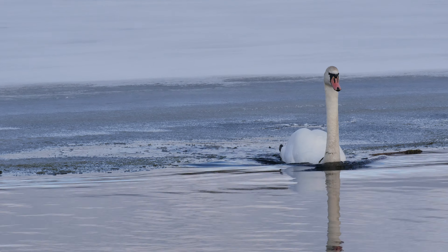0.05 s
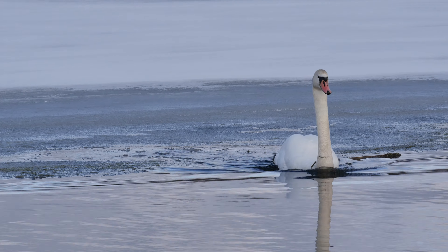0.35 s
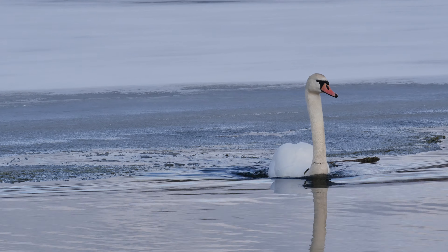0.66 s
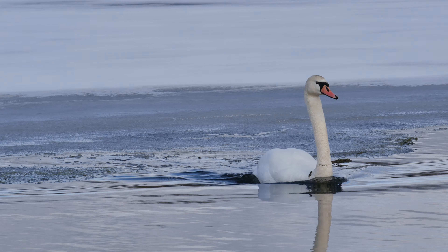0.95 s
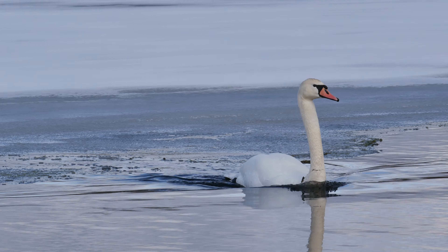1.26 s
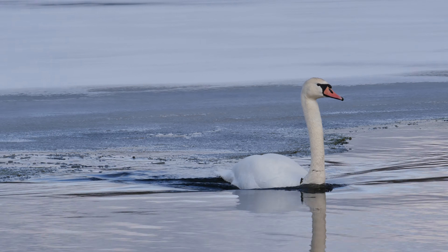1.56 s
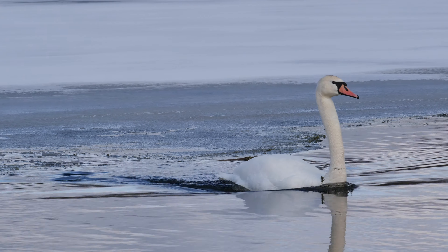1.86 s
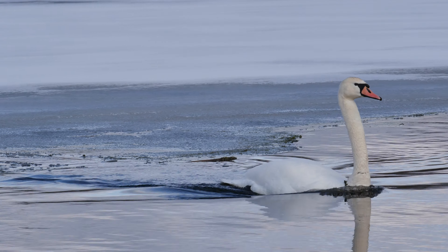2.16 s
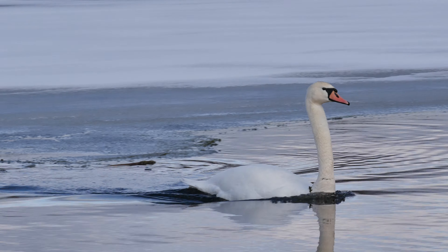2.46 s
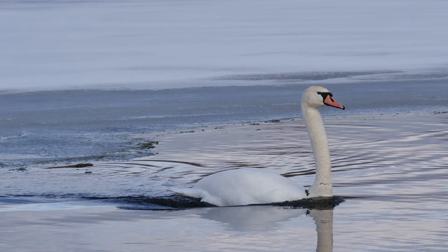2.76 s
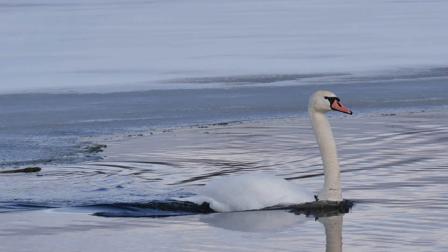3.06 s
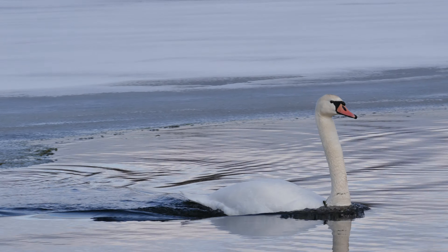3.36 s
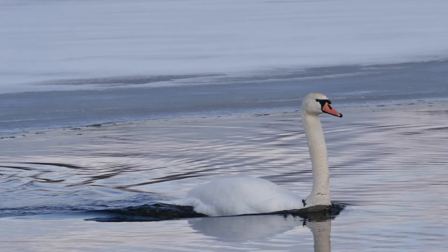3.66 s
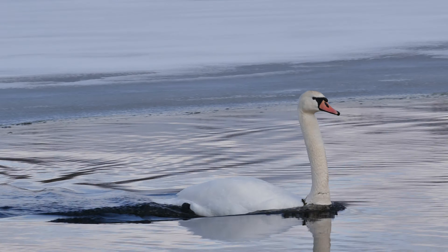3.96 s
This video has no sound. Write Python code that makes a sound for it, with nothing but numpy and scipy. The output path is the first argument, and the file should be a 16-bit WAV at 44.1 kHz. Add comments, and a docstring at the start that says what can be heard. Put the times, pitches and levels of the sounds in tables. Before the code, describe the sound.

Gusts of wind buffet the microphone, with faint drips and ticks from thawing ice behind.

```python
"""Wind on a half-frozen lakeside

Gusts rumble on the microphone and single eddies thump it, the hardest with a dry crack.
The thumps saturate the microphone and make the recorder duck its gain, which creeps back.
Behind them lies a soft far rush, with faint bubbling drips and tiny ticks from the thawing ice."""
import sys
import numpy as np
from scipy import signal
from scipy.io import wavfile
from scipy.ndimage import uniform_filter1d

SR = 44100
rng = np.random.default_rng(int(sys.argv[2]) if len(sys.argv) > 2 else 0)


def unload_audio(sound):
    """Save the sound as a 16-bit wav file, at the path given as the first command line argument."""
    columns = np.transpose(np.atleast_2d(sound))
    # keep every value between -1 and 1, then stretch to whole-number steps
    steps = np.round(np.clip(columns, -1, 1) * 32767)
    wavfile.write(sys.argv[1], SR, steps.astype(np.int16))


N = 176400
T = np.arange(N) / SR

# wind strength at the microphone (time [s], level [dB])
GUST_LEVEL = [(0, -25), (.05, -28.5), (.1, -16.5), (.17, -27.5), (.3, -30.5), (.37, -42), (.52, -30),
              (.58, -37), (.65, -23.5), (.8, -19.5), (.87, -29.5), (.96, -18.5), (1.02, -23), (1.19, -36),
              (1.33, -33.5), (1.42, -48.5), (1.5, -32), (1.62, -41.5), (2.25, -44), (2.3, -24), (2.38, -29),
              (2.45, -16), (2.61, -32.5), (2.68, -31), (2.74, -22), (2.87, -23.5), (2.99, -37.5),
              (3.17, -36), (3.35, -34), (3.5, -31.5), (3.6, -35.5), (3.66, -41), (3.9, -42), (4, -38)]
# rumble bands (low [Hz], high [Hz], level in a strong gust [dB], growth [dB per dB of gust], L-R [dB])
RUMBLE_BANDS = [(71, 140, -29.5, 0.71, 1.1), (104.8, 181.7, -24.5, 1.0, 0.7), (227, 342.3, -30, 1.44, -6),
                (331, 507, -39, 1.9, -13)]
# eddies striking the microphone (time [s], strength [dB], pitch [Hz])
EDDIES = [(0.08, -1, 184), (0.179, -12.5, 190), (.229, -11.5, 158), (.28, -16, 202), (.3, -14, 178),
          (0.51, -18.5, 167), (.561, -17.5, 163), (0.638, -5.5, 169), (.648, -5, 166), (0.678, -6, 161),
          (.787, -9, 187), (.848, -4.5, 167), (0.893, -8, 191), (0.933, -18, 182), (.982, -7, 182),
          (1.005, -2.5, 242), (1.045, -7.5, 177), (1.111, -6.5, 193), (1.123, -10, 166), (1.502, -19, 141),
          (1.655, -20, 128), (1.828, -28.5, 167), (2.298, -9.5, 120), (2.313, -11.5, 197),
          (2.422, -8.5, 241), (2.447, -24, 186), (2.479, -9.5, 175), (2.564, -14, 150), (2.728, -12.5, 176),
          (2.749, -9.5, 200), (2.822, -14.5, 145), (2.896, -12, 156), (3.043, -14, 171), (3.09, -18, 160),
          (3.285, -20, 118), (3.475, -18, 135), (3.526, -20.5, 157), (3.559, -17.5, 156),
          (3.595, -21.5, 143), (3.697, -19, 136)]
# cracks of the hardest eddies at the microphone port (time [s], peak [dB])
PORT_CRACKS = [(0.08, -43), (.846, -40.5), (1.005, -36)]
# meltwater drips (time [s], level [dB], starting pitch [Hz])
MELT_DRIPS = [(.527, -50.5, 2490), (0.529, -53.5, 3170), (1.971, -53, 2950), (2.02, -51.5, 2220),
              (2.103, -52, 3010), (2.276, -48, 2980), (2.518, -53.5, 3120), (2.685, -52.5, 1950),
              (2.94, -56.5, 3030), (3.414, -53, 2290), (3.535, -42.5, 2000), (3.778, -43, 2160),
              (3.881, -56.5, 3330), (3.99, -43, 2080)]
# clear ticks of the ice (time [s], peak [dB], band centre [Hz])
ICE_TICKS = [(.97, -57, 10650), (2.03, -48, 6700), (2.18, -52, 9200), (2.2, -39.5, 9300),
             (2.205, -44, 9400), (3.433, -53, 7370), (3.493, -50, 7040), (3.725, -44.5, 8700),
             (3.882, -48, 9840)]
# swell of the far rush (time [s], level [dB])
RUSH_SWELL = [(0, -46.5), (.3, -45), (.58, -45.5), (.9, -46), (1.3, -46), (2.1, -44.5), (2.9, -46.5),
              (3.5, -44.5), (4, -43)]
# its tone colour (frequency [Hz], relative spectral density [dB])
RUSH_COLOUR = [(100, -14), (300, -6.5), (480, 1.5), (640, -0.5), (800, 2), (1150, -0.5), (1600, -9),
               (2500, -20.5), (3700, -22.5), (5000, -29), (7000, -34.5), (8300, -40.5), (10000, -30),
               (12000, -35), (15000, -37.5)]
# its treble lift (time [s], gain [dB])
RUSH_TREBLE = [(0, 1.5), (.35, 0), (.55, -0.5), (1, -.5), (1.5, -2.5), (2.05, 1), (2.6, 1.5), (3, -3),
               (3.55, 1), (4, 0)]
# how alike its left and right are (frequency [Hz], coherence [0-1])
RUSH_COHERENCE = [(300, .8), (550, 0.63), (850, 1), (2400, 0.61), (5000, .9), (10000, 0.86)]
# its stereo balance (frequency [Hz], L-R [dB])
RUSH_PAN = [(200, 4.5), (500, 4), (900, -2), (1800, -4), (3500, -4), (6000, -1), (10000, 0.5)]
# how far its left side leads (frequency [Hz], phase [rad])
RUSH_LEAD = [(300, 0.98), (700, -.95), (1800, -1.08), (2800, -.55), (4500, -0.47), (9000, 0.42)]

WIND_LAG_S = 0.00041  # the air reaches the right port later


def wind_rumble():
    """Turbulence follows the gust, higher bands more steeply, so strong gusts sound brighter."""
    strong_gust_db = -21
    gust_db = over_time(GUST_LEVEL) - strong_gust_db
    return sum(place(from_db(db + growth * gust_db) * turbulence(low, high), pan_db, WIND_LAG_S)
               for low, high, db, growth, pan_db in RUMBLE_BANDS)


def turbulence(low_hz, high_hz, evenness=0.68, lump_db=5, window=2200):
    """Low pressure noise, its slow swings evened out, arriving in quick lumps."""
    churn = noise(low_hz, high_hz)
    power = uniform_filter1d(uniform_filter1d(churn ** 2, window), window // 2) + 1e-6
    lumps = from_db(lump_db * drift(rate_hz=46.4))
    return unit_power(churn / power ** (evenness / 2) * lumps)


def eddy_thumps(width_cycles=0.47, wake_s=0.0076):
    """Each eddy is one swing of suction and pressure inside a short churning wake."""
    swings, wakes = np.zeros((2, N))
    for s, db, hz in EDDIES:
        cycles = (T - s) * hz
        envelope = np.exp(-.5 * (cycles / width_cycles) ** 2)
        swings += from_db(db - 2.5) * np.sin(2 * np.pi * cycles) * envelope
        wakes += from_db(db - 14.5) * np.exp(-.5 * ((T - s) / wake_s) ** 2)
    return place(swings + wakes * turbulence(95, 290), pan_db=-1.5, lag_s=WIND_LAG_S)


def port_cracks(decay_s=0.00079):
    """The hardest eddies crack at the port, putting a dry edge on their thumps."""
    cracks = sum(from_db(db) * snap(s, decay_s, 500, 2200, order=1) for s, db in PORT_CRACKS)
    return place(cracks, pan_db=-1.5)


def drips(attack_s=0.0016, decay_s=0.0029, rise_per_s=4.4):
    """Each drip splashes and traps a bubble that rings briefly and rises in pitch."""
    out = np.zeros(N)
    for s, db, hz in MELT_DRIPS:
        t = np.clip(T - s, 0, .1)
        splash = from_db(-7.5) * noise(hz * .92, hz * 1.2)
        bubble = np.sin(2 * np.pi * hz * t * (1 + rise_per_s * t / 2))
        envelope = (1 - np.exp(-t / attack_s)) * np.exp(-t / decay_s)
        out += from_db(db) * envelope / (envelope.max() + 1e-9) * (bubble + splash)
    return place(out, pan_db=-5.5)


def thawing_ice(tick_decay_s=.0009, band_ratio=1.24, clicks_per_band_per_s=39):
    """A few bright ticks over a fine crackle of the thaw that swells with the rush."""
    out = sum(from_db(db) * snap(s, tick_decay_s, hz / band_ratio, hz * band_ratio)
              for s, db, hz in ICE_TICKS)
    rush_db = over_time(RUSH_SWELL)
    crackle_gain = from_db(-57.5 + 2.5 * (rush_db - rush_db.max()))
    for hz in (2600, 3400, 4100, 6650, 9800):
        onsets = rng.random(N) < clicks_per_band_per_s / SR
        clicks = onsets * from_db(2.5 * np.minimum(rng.exponential(1, N), 2))
        r, w = np.exp(-hz / (2.5 * SR)), 2 * np.pi * hz / SR  # a ring that decays in 2.5 cycles
        ring = signal.lfilter([0, np.sin(w)], [1, -2 * r * np.cos(w), r * r], clicks + 1e-18)
        out += crackle_gain * ring
    return place(out, pan_db=1.5)


def far_rush(waver_db=1.02, full_treble_hz=4000):
    """A soft, distant bed of third-octave noise: lows lean left, upper mids lean right."""
    out, edges = 0, np.geomspace(110, 15500, 23)
    treble_db = over_time(RUSH_TREBLE)
    for low, high in zip(edges, edges[1:]):
        hz = np.sqrt(low * high)
        coherence = at_hz(RUSH_COHERENCE, hz)
        mid = np.sqrt(1 + coherence) * noise(low, high)
        side = np.sqrt(1 - coherence) * noise(low, high) * [[1], [-1]]
        db = at_hz(RUSH_COLOUR, hz) + waver_db * drift(rate_hz=8)
        db += treble_db * min(hz / full_treble_hz, 1)
        lag_s = at_hz(RUSH_LEAD, hz) / (2 * np.pi * hz)
        out += np.sqrt(high - low) * from_db(db) * place(mid + side, at_hz(RUSH_PAN, hz), lag_s)
    return unit_power(out) * from_db(over_time(RUSH_SWELL))


def from_db(db):
    """Decibels to gain."""
    return 10 ** (db / 20)


def unit_power(x):
    """Scale to an RMS of 1."""
    return x / np.sqrt(np.mean(x ** 2) + 1e-20)


def over_time(points):
    """Read a table as an automation curve."""
    return np.interp(T, *np.transpose(points))


def at_hz(points, hz):
    """Read a table on a log-frequency axis."""
    freqs, values = np.transpose(points)
    return np.interp(np.log(hz), np.log(freqs), values)


def band(x, low_hz, high_hz, order):
    """Butterworth band-pass."""
    return signal.sosfilt(signal.butter(order, [low_hz, high_hz], "band", fs=SR, output="sos"), x + 1e-18)


def noise(low_hz, high_hz):
    """A steady noise band of unit power."""
    return unit_power(band(rng.standard_normal(N + SR // 4), low_hz, high_hz, order=3)[-N:])


def snap(start_s, decay_s, low_hz, high_hz, order=2):
    """A very short noise burst in a band, peaking at 1."""
    envelope = (T >= start_s) * np.exp(-np.clip((T - start_s) / decay_s, 0, 20))
    burst = band(envelope * rng.standard_normal(N), low_hz, high_hz, order)
    return burst / np.abs(burst).max()


def drift(rate_hz, hop=40):
    """Smooth random modulation of unit power."""
    r = np.exp(-2 * np.pi * rate_hz * hop / SR)
    slow = signal.lfilter([1], [1, -2 * r, r * r], rng.standard_normal(N // hop + 2002))[2000:]
    return np.interp(np.arange(N) / hop, np.arange(len(slow)), unit_power(slow))


def place(x, pan_db, lag_s=0):
    """Pan by level and delay; positive values pull left."""
    left, right = np.broadcast_to(x, (2, N))
    return np.array([from_db(pan_db / 2) * np.interp(T + lag_s / 2, T, left),
                     from_db(-pan_db / 2) * np.interp(T - lag_s / 2, T, right)])


def scene():
    """Wind on the microphone, its deepest bass cut, in front of the quiet shore."""
    low_cut = signal.butter(3, 60, "high", fs=SR, output="sos")
    wind = signal.sosfilt(low_cut, wind_rumble() + eddy_thumps())
    return wind + port_cracks() + far_rush() + drips() + thawing_ice()


def record(dry):
    """Hard thumps saturate and duck the gain; the treble is notched, shelved down and cut off."""
    overload, threshold_db, slope = 0.7, -17.5, 0.55
    attack_s, release_db_per_s = 0.0034, 16
    fade_in = np.sin(np.pi / 2 * np.minimum(T / .004, 1)) ** 2
    x = overload * np.tanh(dry * fade_in / overload)
    peak_db = 20 * np.log10(np.abs(x).max(axis=0) + 1e-9)
    duck_db = slope * np.maximum(peak_db - threshold_db, 0)
    duck_db = np.maximum.accumulate(duck_db + release_db_per_s * T) - release_db_per_s * T
    r = np.exp(-1 / (attack_s * SR))
    x = x * from_db(-signal.lfilter([1 - r], [1, -r], duck_db))
    x = signal.lfilter(*signal.iirnotch(7900, Q=16, fs=SR), x)
    dull = signal.sosfiltfilt(signal.butter(8, 10500, fs=SR, output="sos"), x)
    x = dull + from_db(-20.5) * (x - dull)  # a little air leaks past the shelf
    return signal.sosfilt(signal.ellip(10, .2, 70, 15100, fs=SR, output="sos"), x)


dry = scene()
out = record(dry)
unload_audio(out)
```